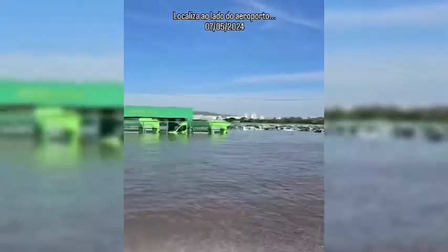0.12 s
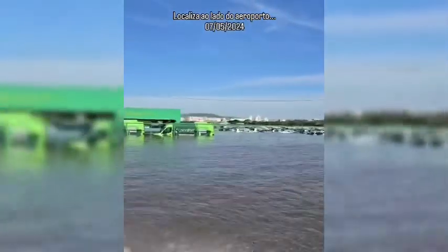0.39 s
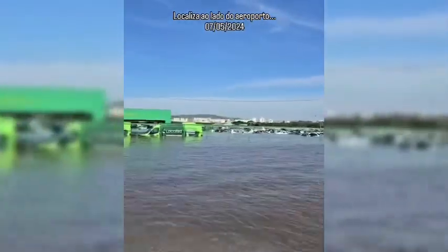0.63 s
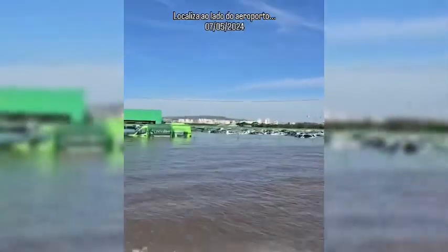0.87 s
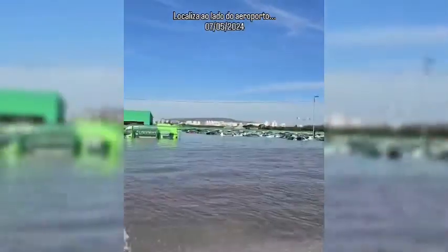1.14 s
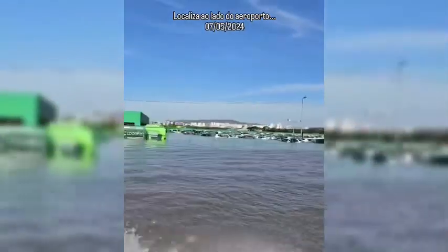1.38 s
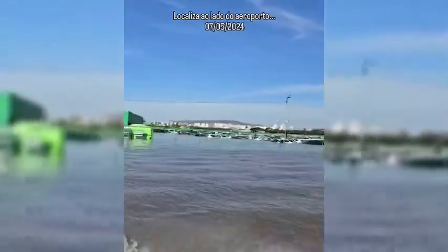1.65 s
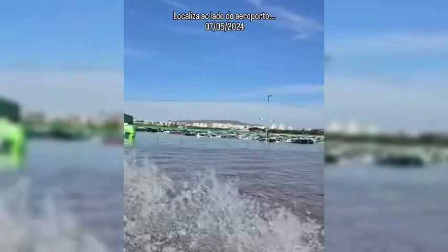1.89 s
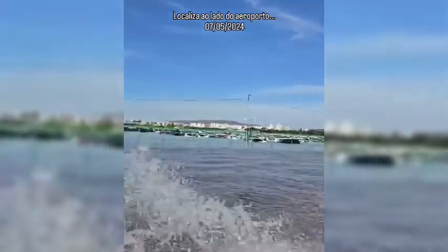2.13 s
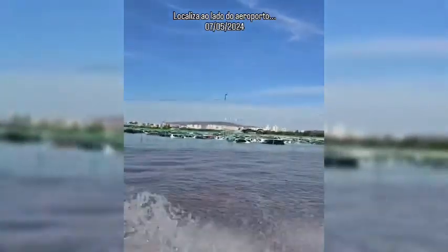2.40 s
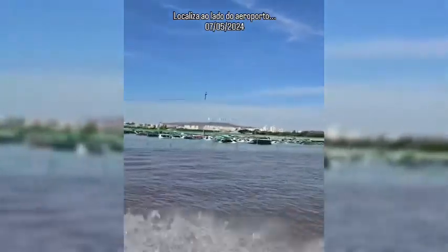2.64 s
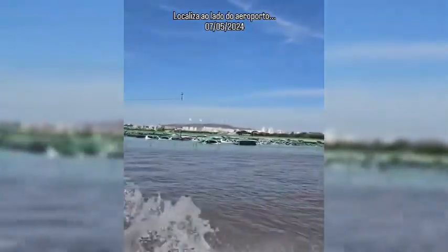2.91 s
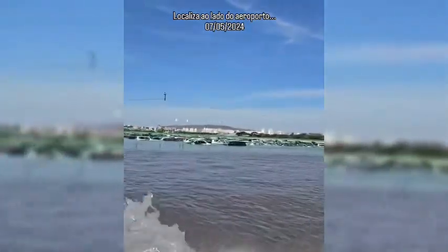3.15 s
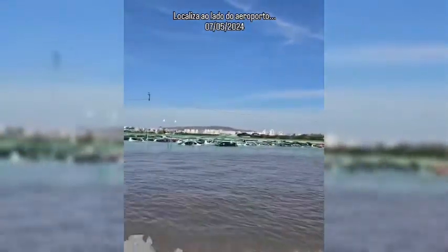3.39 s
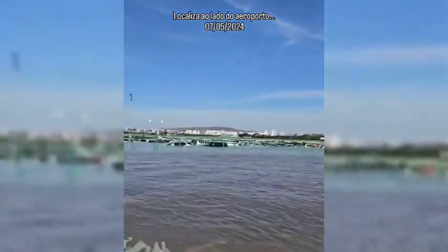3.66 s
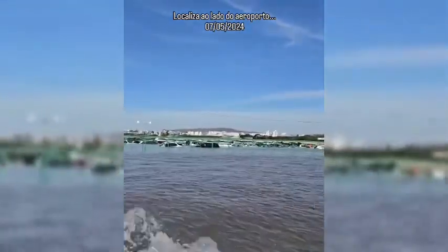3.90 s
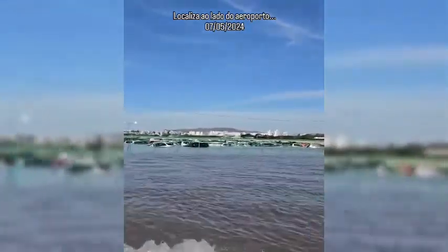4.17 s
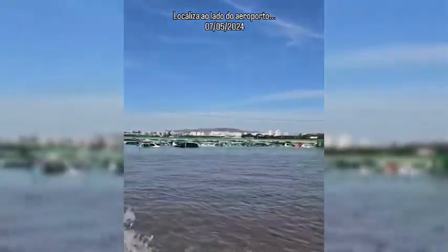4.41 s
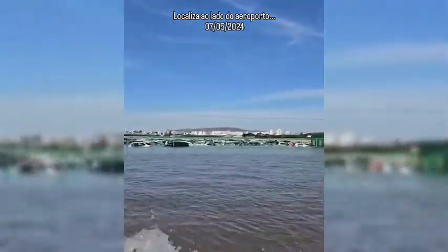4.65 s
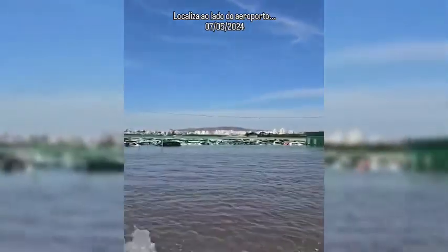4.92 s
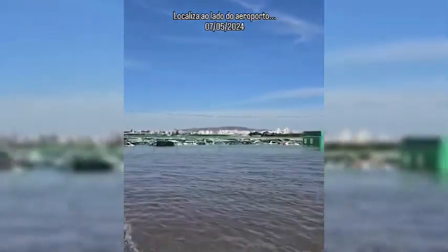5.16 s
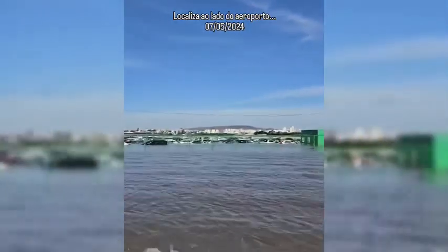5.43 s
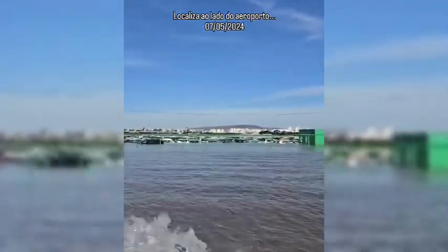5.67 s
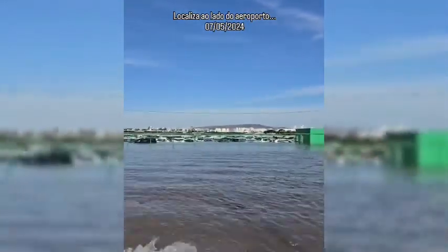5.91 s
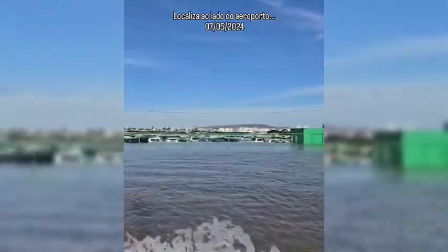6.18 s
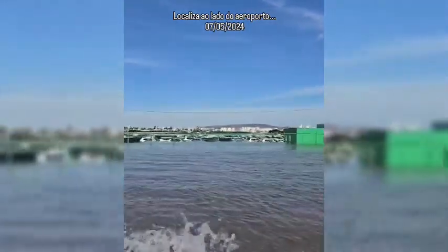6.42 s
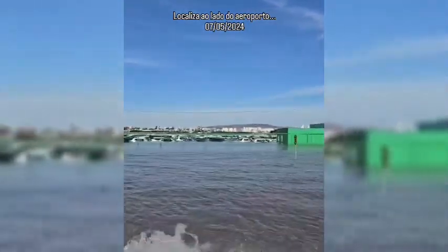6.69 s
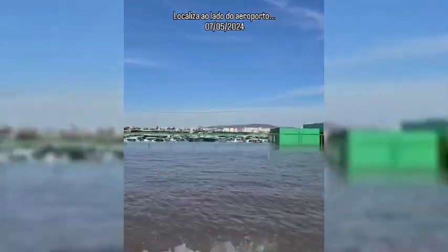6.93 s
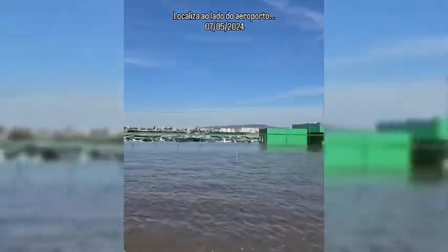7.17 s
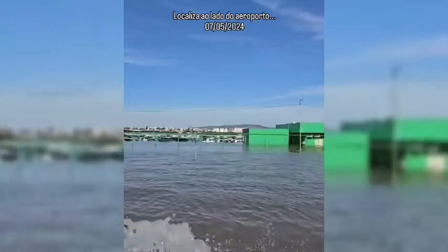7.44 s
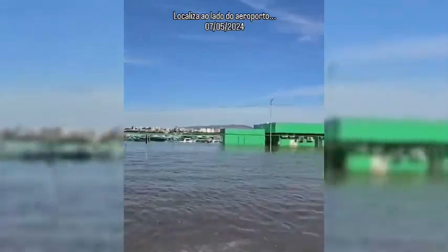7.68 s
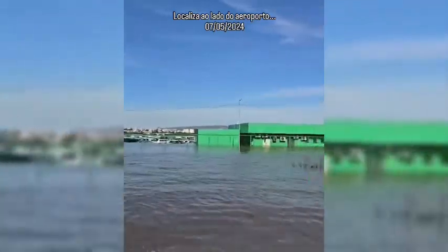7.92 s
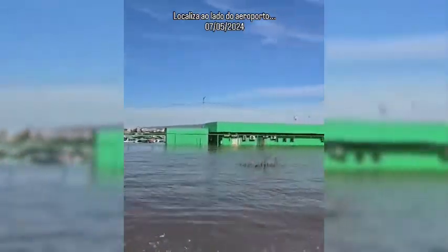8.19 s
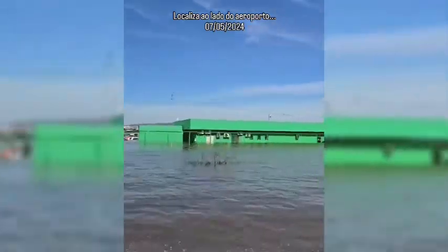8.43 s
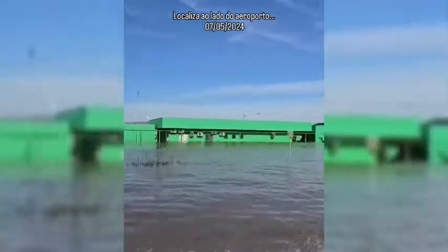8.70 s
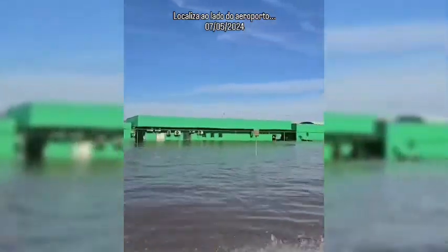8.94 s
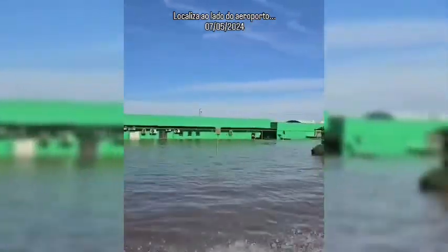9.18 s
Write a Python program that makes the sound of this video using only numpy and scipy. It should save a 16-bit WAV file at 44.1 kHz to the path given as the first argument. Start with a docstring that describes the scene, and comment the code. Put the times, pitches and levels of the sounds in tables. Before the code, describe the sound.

An outboard motor hums steadily on open water, with early splashes and hard wind buffets, dips in pitch briefly, then picks up louder and calmer.

```python
"""An open boat runs over flat water, heard by a phone held near its side.
At first the outboard hums fast, amid splashes and hard wind buffets; from about 1.1 s it eases off.
From about 2 s it picks up again, and later wind and water are mostly calmer, with a few late gusts.
The hum is a few overtones locked to the firing rate; wind, splashes and spray are shaped noise.
The left port is open; the right is covered, so wind booms in its small cavity and treble is shut out."""
import sys
import numpy as np
from scipy import signal
from scipy.fft import rfft, irfft, next_fast_len
from scipy.io import wavfile
from scipy.ndimage import uniform_filter1d, minimum_filter1d

SR = 44100
rng = np.random.default_rng(int(sys.argv[2]) if len(sys.argv) > 2 else 0)


def wrap_up_sound(samples):
    """Save the sound to the file named by the first command line argument, as 16-bit audio."""
    columns = np.atleast_2d(samples).T
    # keep every value between -1 and 1, then stretch to whole-number steps
    tamed = np.clip(columns, -1, 1)
    steps = np.round(tamed * 32767).astype(np.int16)
    wavfile.write(sys.argv[1], SR, steps)


def attenuation_scalar(level_db):
    """Turn a level in dB into a linear amplitude multiplier (20 dB per decade)."""
    decades = np.asarray(level_db, float) / 20
    return 10 ** decades


N = 411012


def curves(table):
    """Columns of a table, joined by straight lines in time."""
    s, *columns = np.transpose(table)
    return [np.interp(np.arange(N) / SR, s, column) for column in columns]


def colour(x, points, band_hz=None):
    """Shape a spectrum; with a band, give that band unit level for unit white input."""
    size = next_fast_len(N + 4096)
    hz = np.fft.rfftfreq(size, 1 / SR)
    point_hz, point_db = np.transpose(points)
    gain = attenuation_scalar(np.interp(np.log(hz + 1), np.log(point_hz), point_db))
    if band_hz:
        in_band = (hz > band_hz[0]) & (hz < band_hz[1])
        gain = gain / np.sqrt(np.sum(gain[in_band] ** 2) / len(hz))
    return irfft(rfft(x, size) * gain, size)[:N]


def octave(x, hz):
    """One of a row of octave bands whose powers add up to the whole."""
    size = next_fast_len(N + 4096)
    octaves_away = np.log2((np.fft.rfftfreq(size, 1 / SR) + 1) / hz)
    gain = np.cos(np.pi / 2 * np.clip(octaves_away, -1, 1))
    return irfft(rfft(x, size) * gain, size)[:N]


def walk(rate):
    """Random levels held 1 / rate s and smoothed twice; spread 1."""
    hold = max(int(SR / rate), 2)
    steps = np.repeat(rng.standard_normal(N // hold + 1), hold)
    x = uniform_filter1d(uniform_filter1d(steps, hold), hold)[:N]
    return x / x.std()


def restless(*walks):
    """White noise whose level walks by (rate per s, spread dB) pairs; mean power about 1."""
    gain = attenuation_scalar(sum(spread_db * walk(rate) for rate, spread_db in walks))
    return rng.standard_normal(N) * gain / np.sqrt(uniform_filter1d(gain ** 2, SR // 4))


def motor():
    """Overtones locked to the firing; uneven burns make level and timing waver."""
    # outboard speed: [t/s, firing rate f/Hz]
    speed = [(0, 145.7), (.3, 147.5), (1.14, 146.6), (1.25, 138.3), (1.45, 126.8), (1.65, 121.6),
             (1.96, 117.6), (2.1, 120.8), (2.28, 125.9), (2.6, 126.2), (3.15, 134.1), (3.4, 140.2),
             (3.8, 144.5), (4.1, 147), (4.4, 147.2), (4.8, 146.7), (5.16, 147.9), (5.24, 150.3),
             (5.65, 153.1), (6.08, 153.3), (6.17, 151.5), (6.4, 152.9), (7.05, 152.9), (7.45, 151),
             (9.32, 149.6)]
    # main overtones of the hum: [t/s, 1st level/dB, 2nd level/dB, 3rd level/dB]
    strengths = [(0, -17.5, -28.5, -30.5), (.35, -19, -26.5, -36), (.6, -19, -30.5, -35.5),
                 (1.1, -18, -27, -38), (1.17, -16, -21.5, -38), (1.25, -19.5, -26, -46),
                 (1.45, -21, -26, -43), (1.95, -21.5, -28, -44), (2.25, -17.5, -26.5, -36),
                 (2.8, -17.5, -25, -42), (3.19, -16, -26, -42.5), (3.23, -11, -19, -34),
                 (3.39, -10.5, -23.5, -33), (3.5, -14, -22, -28), (3.8, -11.7, -22, -28.5),
                 (4.15, -14, -24.5, -25), (4.35, -12, -22, -33), (4.64, -14.5, -24, -31),
                 (4.85, -12, -22.5, -28.5), (5.1, -11, -24, -29), (5.5, -13, -22.5, -26),
                 (5.62, -11, -22.5, -29), (5.81, -13.5, -25.5, -29), (6.1, -13.5, -24, -34.5),
                 (6.3, -14, -24.5, -30), (6.7, -15, -22.5, -44), (6.95, -15, -24, -33),
                 (7.32, -13.5, -22, -39.5), (7.65, -14, -25.5, -30.5), (8.1, -13.5, -23.5, -27),
                 (8.6, -13, -27.5, -24), (9.1, -11.5, -25.5, -24.5), (9.32, -13.5, -24, -25)]
    # pulse shape as the phone turns: [t/s, 2nd overtone phase/rad, left minus right of 2nd/dB, of 3rd/dB]
    pulse_shape = [(0, 1.57, -6.5, -5), (1.9, 0.63, -4, -4), (3.1, 2.02, -4.5, -8), (3.8, 2.8, -2, 6.5),
                   (5.6, 3.26, -1.5, 4), (6.4, 3.1, -2, 15.5), (7.3, 2.92, -2, 10), (7.9, 2.96, -1.5, 4),
                   (9.32, 3.1, -1.5, -2)]
    # weak overtones, the halves from unequal cylinders:
    # [multiple of firing rate, level relative to 1st/dB, left minus right/dB, left minus right phase/rad]
    weak = [(.5, -43, 4.5, 0), (1.5, -34.5, 1.5, -0.26), (2.5, -47.5, 1.5, 0), (4, -29, 0.5, -1.4),
            (5, -31.5, -4, 0.61), (6, -29.5, -10, 0.66)]
    left_lag_s = 0.00012
    waver_hz, waver_db = 0.5983, (1.0, 1.7, 1.5)

    (hz,), levels_db = curves(speed), curves(strengths)
    hz = hz + waver_hz * walk(14)
    levels_db = [db + spread * (0.62 * walk(11) + 0.59 * walk(22))
                 for db, spread in zip(levels_db, waver_db)]
    second_rad, *pans_db = curves(pulse_shape)
    right_turn = 2 * np.pi * np.cumsum(hz) / SR + 0.041 * walk(40)
    turn = np.array([right_turn - 2 * np.pi * hz * left_lag_s, right_turn])
    burn_db = 0.21 * walk(18) + 0.6 * walk(70)
    side = np.array([[.5], [-.5]])  # shares a left-right difference between the ports
    hum = 0
    for k, db, rad, left_db in zip((1, 2, 3), levels_db, (0, second_rad, 1.5), (-.3, *pans_db)):
        # higher overtones reach each port by more paths, so they waver more and apart
        apart = np.array([walk(9.8) + 0.91 * walk(25), walk(9) + 0.61 * walk(25)])
        apart = (0.13 + 0.69 * (k - 1)) * apart
        level = attenuation_scalar(db + burn_db + apart + side * left_db)
        hum = hum + level * np.cos(k * turn + rad + 0.073 * apart)
    for k, db, left_db, left_rad in weak:
        level = attenuation_scalar(levels_db[0] + db + side * left_db + 2.9 * walk(5))
        drift_rad = k % 1 * 3 * walk(6) + 0.36 * walk(9)  # the halves drift more
        hum = hum + level * np.cos(k * turn + side * left_rad + drift_rad)
    return np.sqrt(2) * hum, right_turn


def buffets():
    """Sudden blows: each rises in a few ms after a short lull, and dies in hundredths of a second."""
    # strong buffets in the covered port: [t/s, level before the blow's shape and trim/dB]
    strong = [(0.082, -12), (0.389, -9.5), (0.503, -7.5), (0.564, -9.5), (0.627, -19.5), (0.758, -13.5),
              (0.849, -10), (0.936, -17.5), (1.267, -15.5), (1.434, -15), (1.549, -13.5), (1.693, -11),
              (2.191, -20), (2.544, -13.5), (3.684, -15), (3.846, -17.5), (4.771, -19.5), (5.015, -19),
              (6.041, -17), (7.731, -13.5), (7.781, -14.5), (8.644, -21.5)]
    starts = np.zeros(N)
    s, peak_db = np.transpose(strong)
    starts[(s * SR).astype(int)] = attenuation_scalar(peak_db - 1.0)
    when, weaker = rng.random((6, 2)).T  # six small ones at random times
    starts[(when * N).astype(int)] = attenuation_scalar(-21 - 6 * weaker)
    age = np.arange(SR // 12) / SR
    blow = 1.37 * (1 - np.exp(-age / 0.003)) * np.exp(-age / 0.012)
    blows = signal.fftconvolve(starts, blow)[:N]
    # run backwards in time, so that the lull comes before the blow
    backwards = 1. * (starts > 0)[::-1]
    before = signal.fftconvolve(backwards, np.exp(-age / 0.013))[:N][::-1]
    return blows, 1 - 1.14 * np.clip(before, 0, 1)


def covered_wind(covered_db, right_rumble_db, turn):
    """Gusts ring the small cavity; the harder, the rougher; the hum shakes the cover a little."""
    # sound of wind in the cavity, before scaling to its band: [f/Hz, level/dB]
    cavity = [(60, -18.5), (200, -6), (450, -6.5), (680, -3.5), (850, 2), (1000, -6.5), (1200, -18.5),
              (1500, -21.5), (2000, -38), (3000, -49.5), (5500, -77), (8000, -84.5)]
    rough = np.clip((covered_db + 29.0) / 14, .2, 1.2)
    gusts = attenuation_scalar(rough * np.minimum(0.68 * walk(25) + 0.83 * walk(90), 4.5))
    gusts = gusts / np.sqrt(uniform_filter1d(gusts ** 2, SR // 5))
    gusts = gusts * (1 + 0.091 * np.cos(turn))
    blows, lull = buffets()
    push = np.hypot(attenuation_scalar(covered_db - 1.24) * gusts * lull, blows)
    air = push * rng.standard_normal(N)
    # gusts mostly feed the cavity's ring; below it the level goes with the rumble
    under = attenuation_scalar(0.47 * (right_rumble_db + 44.0) - 0.26 * (covered_db + 19.5))
    deep = colour(air, [(420, -3), (640, -25.5)])
    return colour(air + (under - 1) * deep, cavity, (500, 1100))


def open_wind(open_db):
    """Eddies of each size come and go alone on the open port, and a harder gust is brighter."""
    # sound of wind on the open port, before scaling to its band: [f/Hz, level/dB]
    open_sound = [(60, -15.5), (130, -2), (220, 1.5), (370, 1), (600, -3), (850, -7.5), (1200, -9),
                  (1600, -17), (2500, -36), (5000, -45.5)]
    eddies = 0
    for tilt, hz in ((-.5, 102), (-.4, 197), (-.1, 395), (.15, 834), (.4, 1600), (.3, 3160)):
        eddy = attenuation_scalar(tilt * (open_db + 24.0)) * restless((20, 1.5), (80, 2))
        eddies = eddies + octave(eddy, hz)
    return colour(attenuation_scalar(open_db + 0.79 * walk(30)) * eddies, open_sound, (350, 1000))


def rumble():
    """Low wind noise, separate at each port; also gives the right port's rumble level."""
    # steady course of the rumble: [t/s, left level/dB, right level/dB]
    course = [(0, -43.5, -40.5), (.4, -43, -45), (.85, -47.5, -39), (1.07, -47, -43), (1.25, -39, -38.5),
              (1.7, -38, -32), (1.87, -44, -51.5), (2.06, -32, -42), (2.3, -46, -48.5), (2.68, -33.5, -35),
              (3.1, -43.5, -41), (3.8, -45.5, -47.5), (4.6, -40, -41.5), (5.6, -51.5, -45.5),
              (6.4, -51.5, -54.5), (6.9, -46.5, -43), (8.0, -51, -49.5), (9.32, -46.5, -46.5)]
    # sound of the rumble, before scaling to its band: [f/Hz, level/dB]
    rumble_colour = [(15, -14.5), (30, 17.5), (45, 21.5), (70, 21.5), (110, 15.5), (250, -4), (500, -56.5)]
    # the open port colours its rumble its own way: [f/Hz, gain/dB]
    open_bass = [(20, 1.5), (60, -1.5), (120, 3.5)]
    levels_db = [db + 3 * walk(5) for db in curves(course)]
    left, right = [colour(attenuation_scalar(db) * restless((6, 3.5), (18, 3)), rumble_colour, (25, 90))
                   for db in levels_db]
    return np.array([colour(left, open_bass), right]), levels_db[1]


def wind(covered_db, open_db, turn):
    """Eddies buffet each port alone, over a low rumble."""
    low, right_rumble_db = rumble()
    return low + np.array([open_wind(open_db), covered_wind(covered_db, right_rumble_db, turn)])


def water(splash_db, spray_db, bright_db):
    """Sheets of water slap down in bursts of drops, each drop size on its own, over a hiss of spray."""
    # filter that gives the splash its sound, before scaling to its band: [f/Hz, level/dB]
    splash_filter = [(500, -35), (1100, -3), (1600, -0.5), (2100, 1.5), (3000, 2), (4000, -2.5),
                     (5500, -12.5), (8000, -34.5)]
    # filter for the spray hiss, before scaling to its band; the steep drop above 13 kHz
    # is a limit on the treble one hears, not a trait of spray itself: [f/Hz, level/dB]
    hiss_filter = [(500, 8.5), (1500, 9.5), (3000, 5), (5500, 1.5), (7000, 0), (8500, -2.5), (9500, -7.5),
                   (11000, -6.5), (13000, -5.5), (13200, -33)]
    # what the cover lets through from outside: [f/Hz, gain/dB]
    cover = [(400, -6), (850, -5), (1200, 0.5), (2000, -16.5), (3000, -22), (5500, -43.5), (7000, -48.5),
             (9500, -49.5), (12000, -34)]
    slap_db = 0.34 * walk(30)
    drops = 0
    for tilt, hz in ((-0.77, 800), (-0.7, 1550), (0.24, 3240), (1.0, 6300)):
        drop_level = attenuation_scalar(slap_db + tilt * bright_db)
        drops = drops + octave(drop_level * restless((30, .8), (120, 1.3), (600, 1.6)), hz)
    splash = colour(attenuation_scalar(splash_db - 4.0) * drops, splash_filter, (1500, 4500))
    spray = []
    for _ in range(2):  # separate hiss at each port
        hiss = sum(octave(restless((12, .7), (300, 1.2)), 400 * 2 ** k) for k in range(6))
        spray.append(colour(attenuation_scalar(spray_db) * hiss, hiss_filter, (6000, 12000)))
    return np.array([splash + spray[0], colour(0.2 * splash + spray[1], cover)])


def swells(table, rise_s, fall_s):
    """Power of each event: rise, hold, exponential fall; one row an event, every 64 samples."""
    s, hold, db = np.transpose(table)[:3, :, None]
    age = np.arange(0, N, 64) / SR - s
    shape = np.clip(age / rise_s + 1, 0, 1) * np.exp(-np.maximum(age - hold, 0) / fall_s)
    return (attenuation_scalar(db) * shape) ** 2


def weather():
    """Levels of wind and water: a steady bed that wanders, with gusts, puffs and sheets on top."""
    # steady bed: [t/s, wind in covered port level/dB, wind on open port level/dB,
    # wash level/dB, spray hiss level/dB, wash brightness/dB]
    bed = [(0, -21.5, -31.5, -36.5, -48.5, 1), (.6, -22.5, -31.5, -31.5, -47, -7),
           (1.1, -20, -30, -35.5, -46.5, -11), (1.65, -22.5, -33, -35.5, -45, -12.5),
           (2.1, -21.5, -28, -25.5, -46, -5.5), (2.6, -21, -29, -34.5, -44, -13),
           (2.85, -21.5, -30, -36, -42, -10), (3.15, -24, -32.5, -38.5, -43.5, 0),
           (3.4, -25, -27.5, -40.5, -45, 8), (3.9, -22, -26.5, -39, -45.5, 6),
           (4.35, -23, -30.5, -41, -46.5, 3), (5.0, -25, -27, -40.5, -47, 0),
           (5.5, -24.5, -32, -41.5, -48.5, -3), (6.3, -24, -31.5, -44, -48.5, -2),
           (6.9, -24, -30, -42.5, -49, 4), (7.9, -24, -32, -42, -48.5, -1), (8.7, -26, -30, -43, -48.5, 2),
           (9.05, -26, -28.5, -44, -48, -10), (9.32, -25.5, -25.5, -41, -49, -18)]
    # gusts in the covered port, t at full strength: [t/s, hold/s, level/dB]
    gusts = [(.04, 0.21, -18), (.19, 0.048, -17.5), (.28, 0.076, -13), (.39, .07, -13.5), (.5, 0.056, -14),
             (.84, 0.025, -18.5), (1.74, 0.22, -13), (2.19, .15, -14), (2.4, 0.17, -18.5),
             (2.66, .03, -20.5), (2.93, 0.024, -17.5), (3.77, .04, -23), (7.56, .04, -22.5),
             (7.74, .06, -21.5)]
    # puffs on the open port, t at full strength: [t/s, hold/s, level/dB]
    puffs = [(.27, .05, -26.5), (.48, .03, -33.5), (1.17, 0.023, -19.5), (3.21, 0.073, -24),
             (3.94, .03, -26), (4.2, .04, -29.5), (7.42, 0.19, -25.5), (9.28, .04, -23)]
    # sheets of water thrown up by the bow, t at full strength: [t/s, hold/s, level/dB, brightness/dB]
    sheets = [(.175, 0.034, -28, -3.5), (.24, .02, -27.5, 2), (.295, 0.064, -25, 6.5), (.36, .04, -32, 7),
              (.465, 0.047, -23, 1), (.6, .03, -30, 0), (.675, .03, -30.5, -11), (.92, .03, -32, -10),
              (1.35, .03, -31, -3), (1.72, 0.079, -28, 0), (1.84, .14, -26, 4.5), (2.045, .02, -29, 2),
              (2.19, .03, -26, -4), (2.27, 0.059, -25, 0), (2.41, 0.049, -31.5, -7), (3.95, 0.027, -42, -9),
              (7.43, .16, -40, -15.5), (9.28, 0.037, -36, -9)]
    wander_db = (1.1, 1.8, 0.99, .5, 2.3)  # spread, in the order of the bed's columns

    def full(values):
        """Fill in between values 64 samples apart."""
        return np.interp(np.arange(N), np.arange(len(values)) * 64, values)

    def over(db, power):
        """Add event power to a steady level; the sum in dB."""
        return 10 * np.log10(attenuation_scalar(db) ** 2 + full(power))

    covered, opened, wash, spray, bright = (
        column + spread * walk(11) for column, spread in zip(curves(bed), wander_db))
    sheet_power = swells(sheets, 0.022, 0.079)
    splash = over(wash, sheet_power.sum(0))
    # brightness is the average of wash and sheets, weighted by power
    sheet_bright = full(np.transpose(sheets)[3] @ sheet_power)
    bright = (attenuation_scalar(wash) ** 2 * bright + sheet_bright) / attenuation_scalar(splash) ** 2
    covered = over(covered, swells(gusts, .03, .03).sum(0))
    opened = over(opened, swells(puffs, 0.026, .05).sum(0))
    spray = over(spray, attenuation_scalar(-24.5) ** 2 * sheet_power.sum(0))  # a sheet adds a little hiss
    return covered, opened, splash, spray, bright


def scene():
    """Motor, wind and water at the two ports."""
    covered_db, open_db, *water_db = weather()
    hum, turn = motor()
    return hum + wind(covered_db, open_db, turn) + water(*water_db)


def band_limit(x):
    """A steep low-pass at the top of the band."""
    return signal.sosfilt(signal.butter(12, 14190, fs=SR, output="sos"), x)


def record(dry):
    """The phone's limiter ducks each channel smoothly around its loudest peaks."""
    ceiling, reach = .9, SR // 300  # reach in samples
    duck = np.minimum(ceiling / (np.abs(dry) + 1e-9), 1)
    duck = minimum_filter1d(duck, 2 * reach + 1, axis=1)
    duck = uniform_filter1d(uniform_filter1d(duck, reach, axis=1), reach, axis=1)
    return band_limit(dry * duck)


dry = scene()
out = record(dry)
wrap_up_sound(out)
```